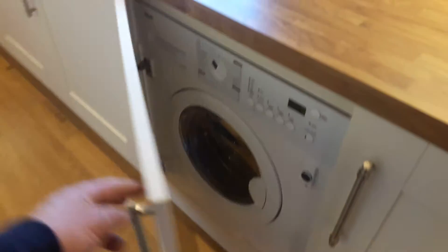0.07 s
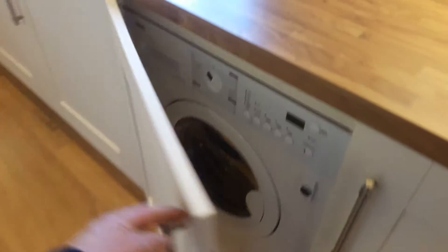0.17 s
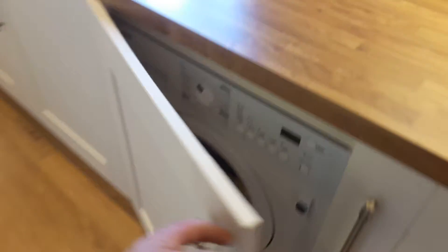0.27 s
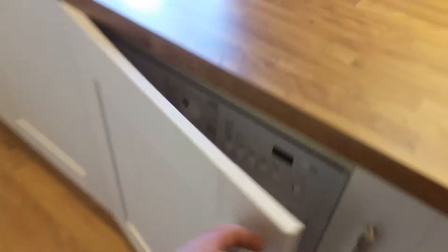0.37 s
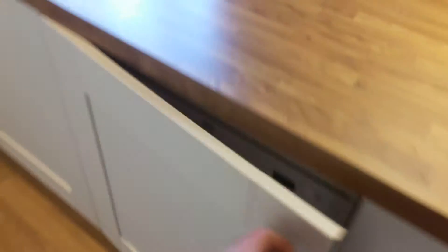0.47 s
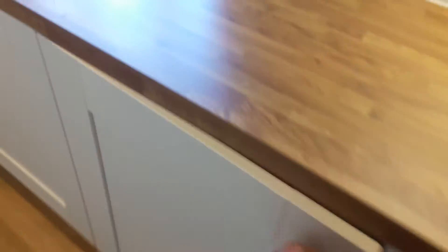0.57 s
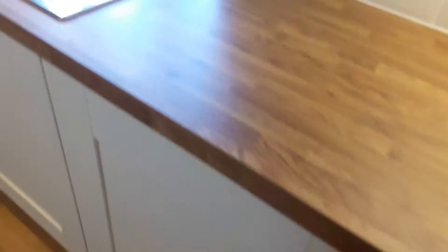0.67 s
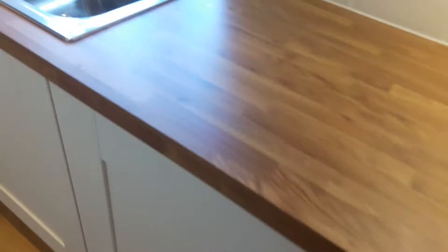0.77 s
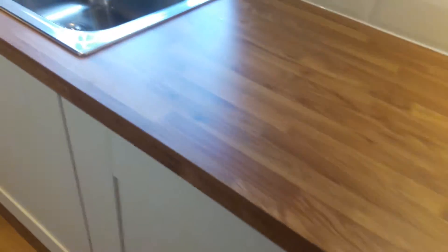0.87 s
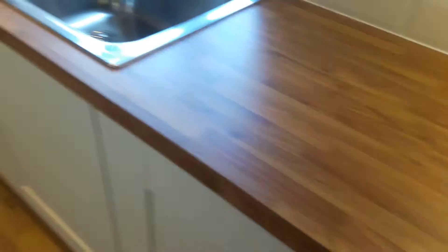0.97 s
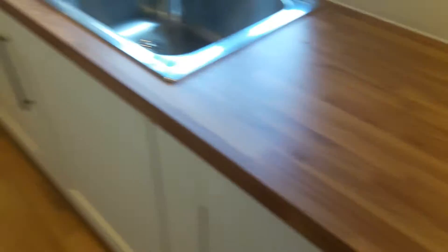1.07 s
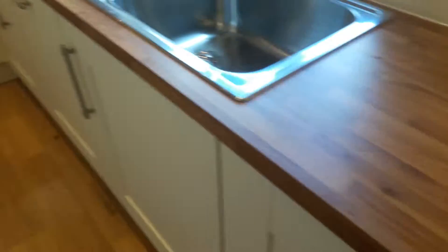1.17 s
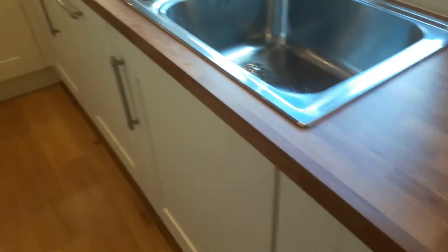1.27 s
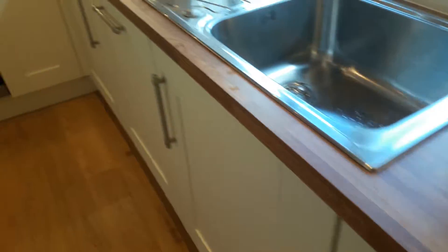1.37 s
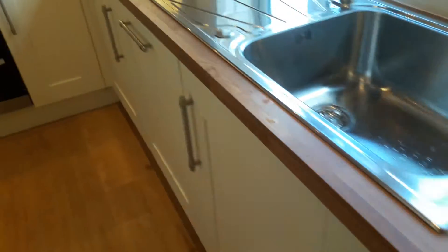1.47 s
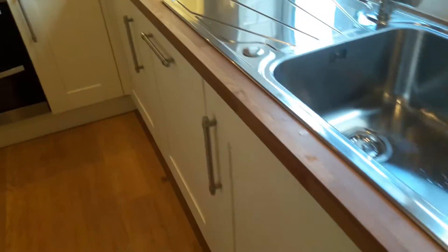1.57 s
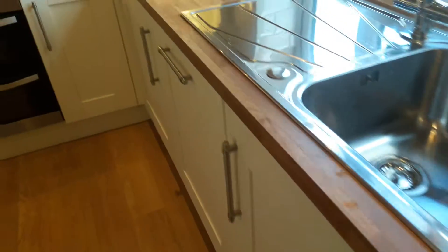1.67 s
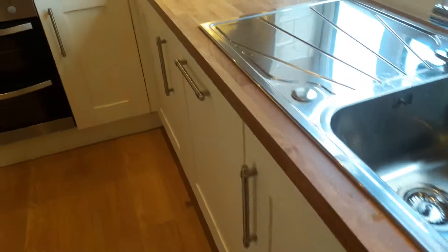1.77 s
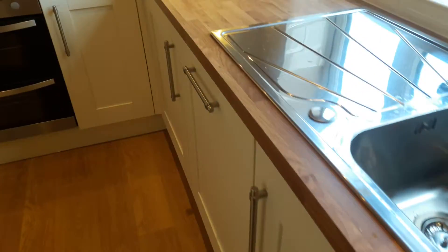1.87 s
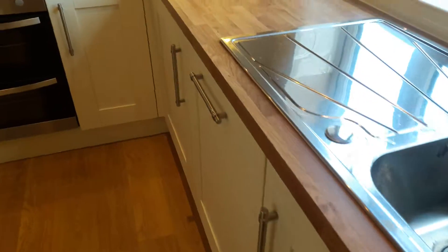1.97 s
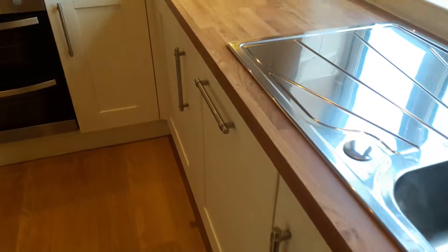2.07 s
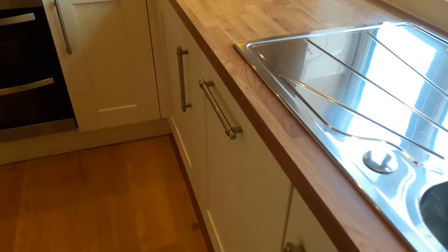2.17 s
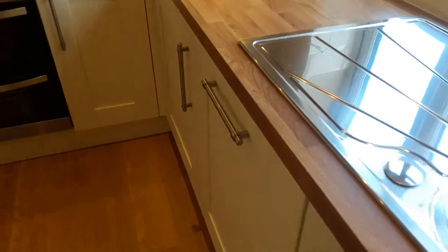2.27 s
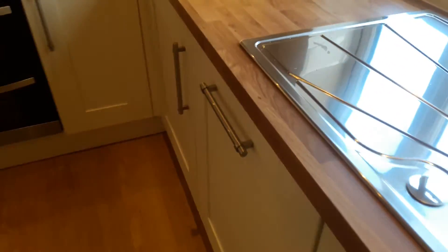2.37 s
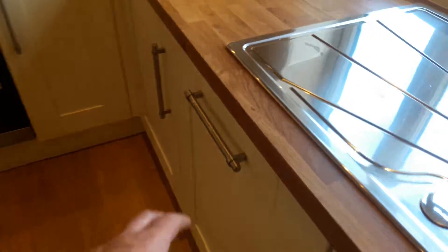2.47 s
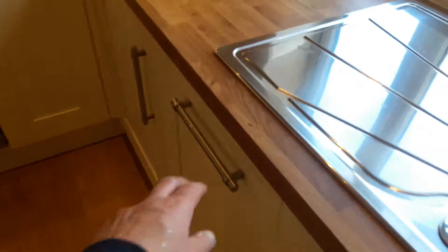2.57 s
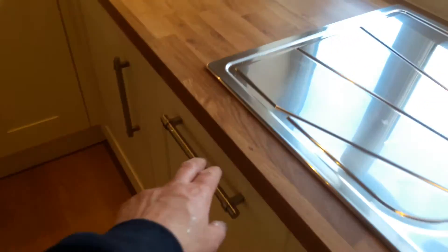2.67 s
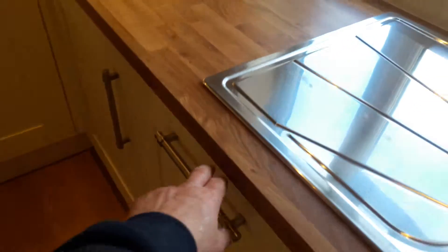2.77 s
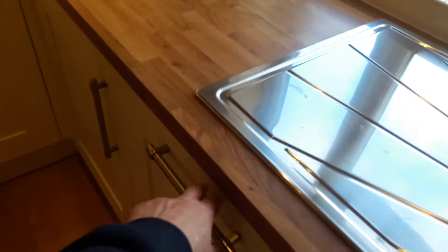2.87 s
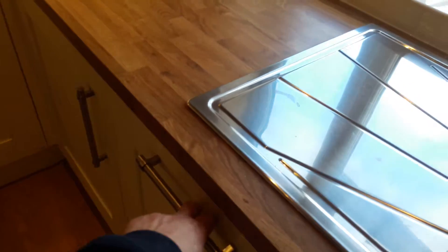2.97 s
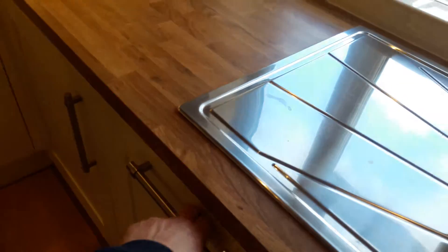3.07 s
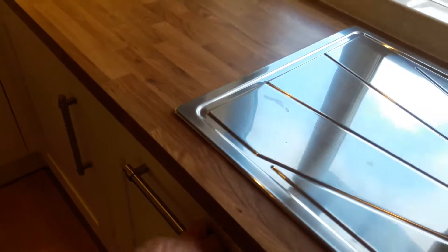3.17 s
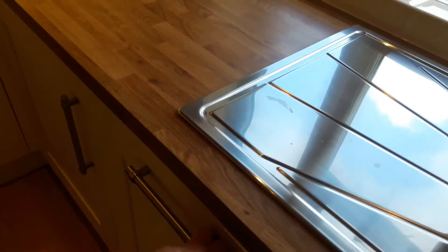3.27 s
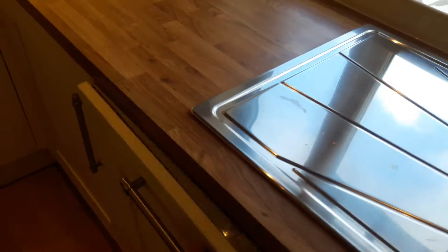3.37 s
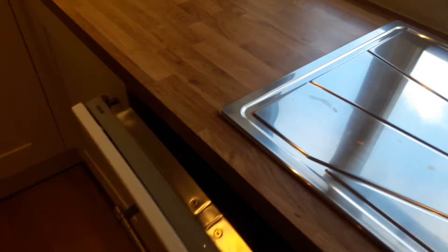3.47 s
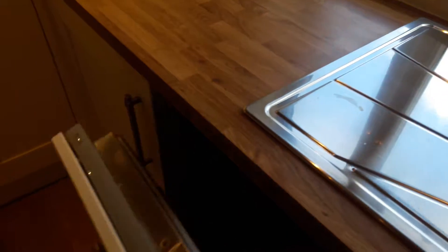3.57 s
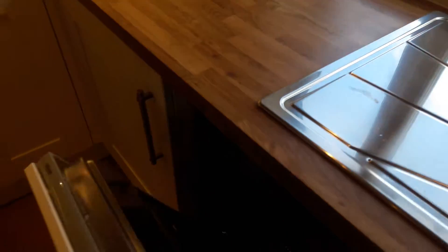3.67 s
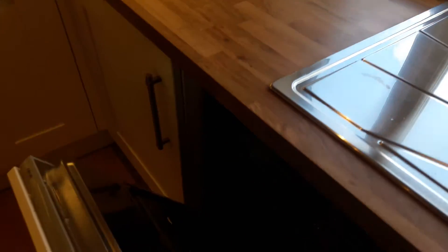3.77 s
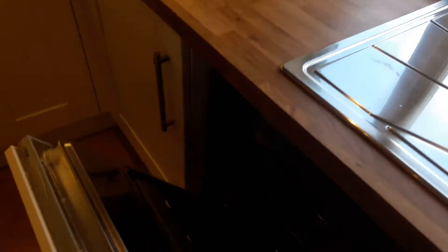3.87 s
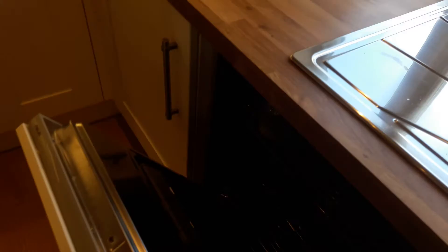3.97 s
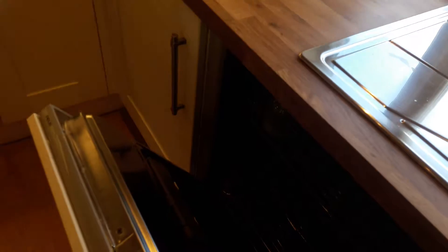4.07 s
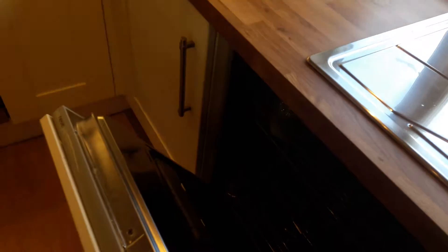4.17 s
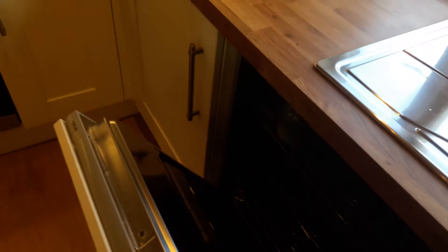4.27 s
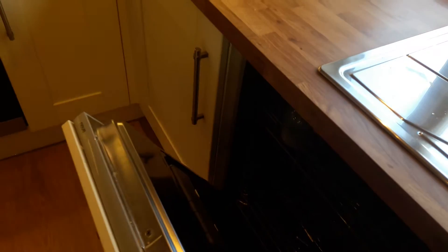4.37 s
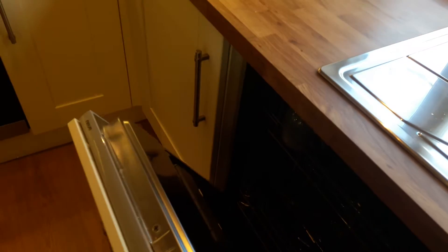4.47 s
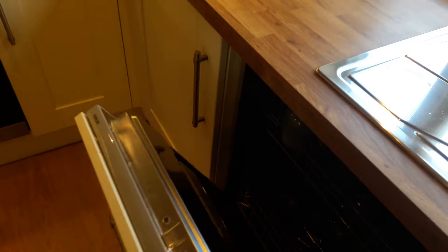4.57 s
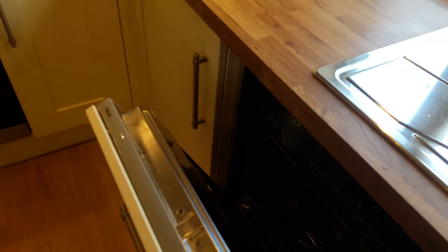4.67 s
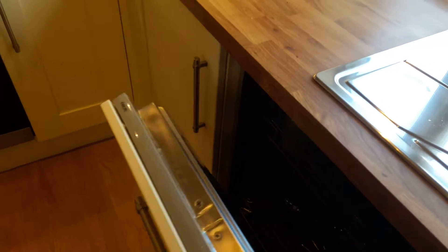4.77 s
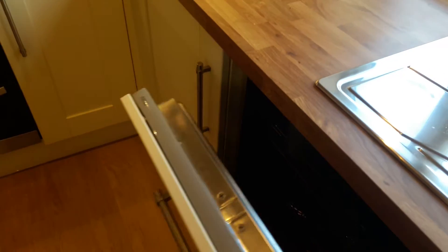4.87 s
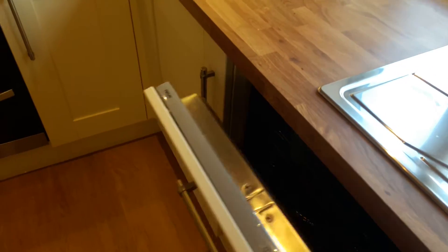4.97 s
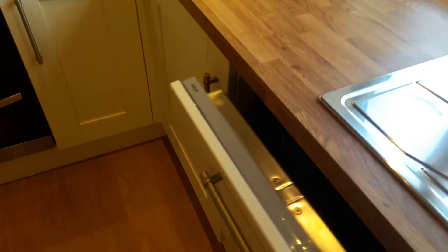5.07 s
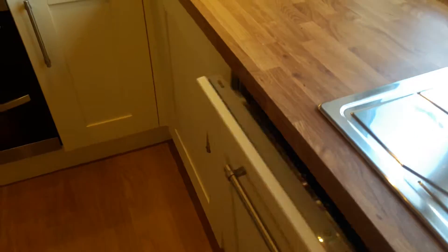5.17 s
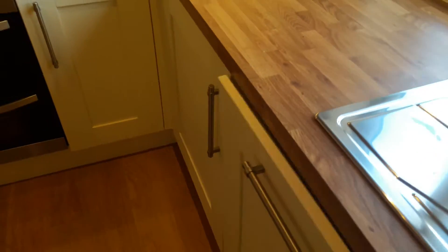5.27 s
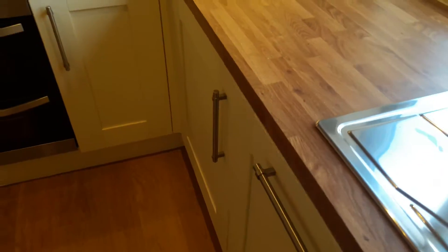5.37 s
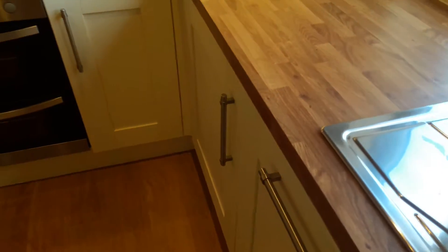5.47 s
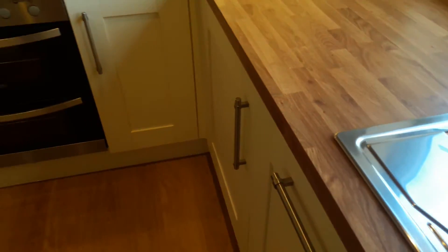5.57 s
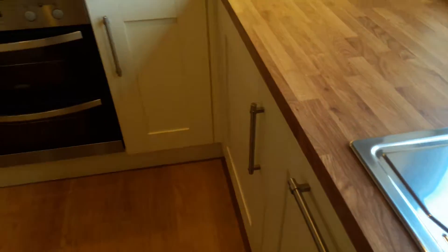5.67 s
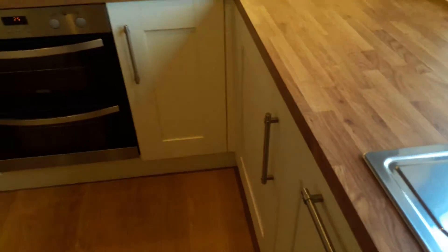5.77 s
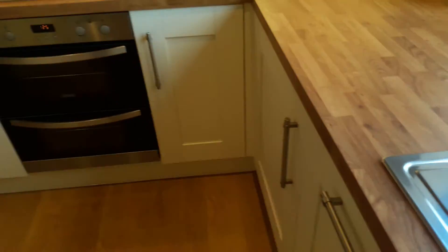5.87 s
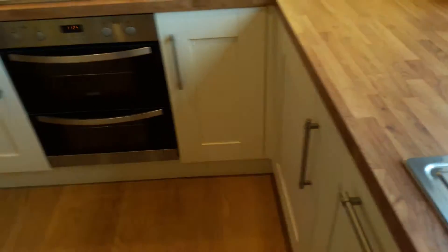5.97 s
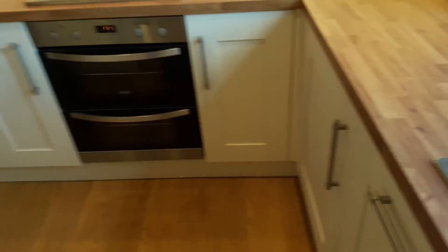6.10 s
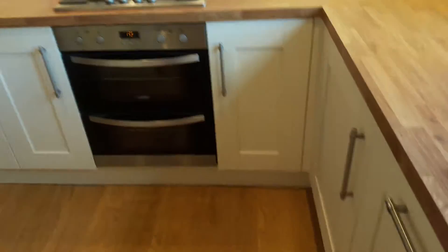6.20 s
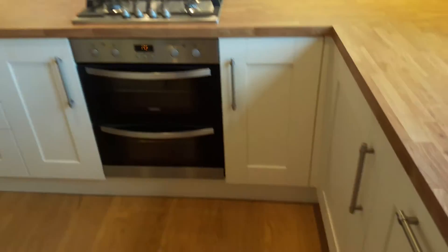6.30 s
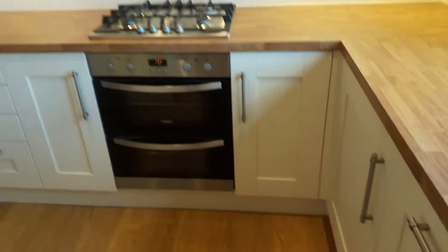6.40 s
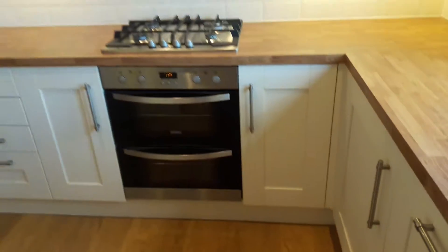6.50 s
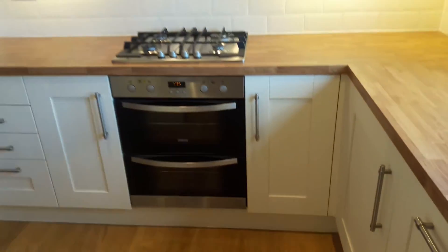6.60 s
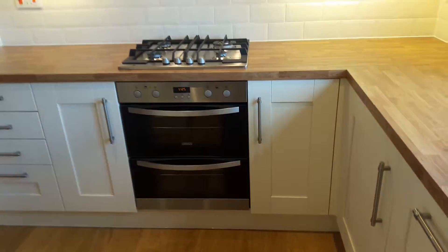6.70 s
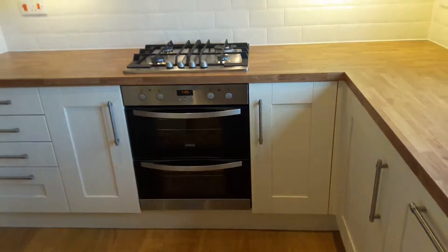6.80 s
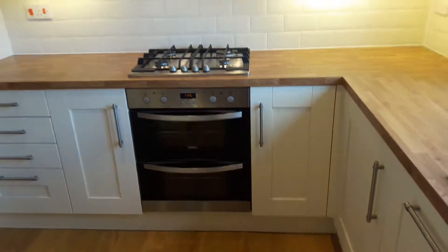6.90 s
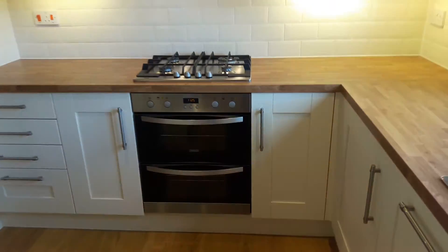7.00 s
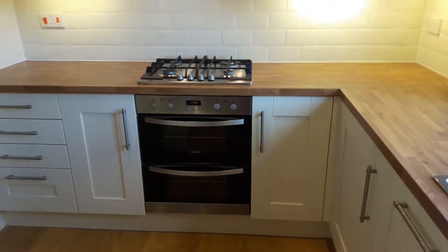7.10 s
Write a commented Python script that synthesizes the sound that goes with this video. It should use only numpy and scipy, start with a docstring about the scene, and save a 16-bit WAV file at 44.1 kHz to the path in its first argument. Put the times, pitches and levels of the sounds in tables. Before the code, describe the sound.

A cupboard door knocks shut in a bare, echoing kitchen. Someone takes a few light steps on wooden boards, clothes rustling softly, then pulls a dishwasher door off its latch with a loud clunk. After a short pause the door touches lightly and shuts with a loud, ringing thud, followed by a few faint steps. The nearby microphone also picks up soft low bumps, a faint hum and quiet room tone.

```python
"""A bare, echoing kitchen with a wooden floor. Someone shuts a cupboard, walks across the boards, pulls a
dishwasher door off its latch and pushes it shut again. Each door cracks, rings in its panel and sets the
room off; each footstep is a heel knock over a thud of the boards. Clothes rustle in swells of noise,
a hinge squeaks faintly and a low hum comes and goes, over a bed of room tone and soft low thumps."""
import sys
import numpy as np
from scipy import signal
from scipy.io import wavfile

SR = 44100
rng = np.random.default_rng(int(sys.argv[2]) if len(sys.argv) > 2 else 0)


def materialize(psi):
    """Save the field psi as 16-bit PCM at rate SR to the path in sys.argv[1].

    A 1-D psi becomes a single channel; in a 2-D psi each row is a channel.
    """
    bounded = np.clip(np.atleast_2d(psi).T, -1, 1)
    quanta = np.round(bounded * 32767).astype(np.int16)
    wavfile.write(sys.argv[1], SR, quanta)


N = 314850

# The door hits: cupboard shuts, latch opens, dishwasher door touches, then shuts. Each row: start in
# seconds, crack, ring and room sends in dB, rattle length in seconds, pan in dB (positive is left).
DOOR_HITS = [(0.773, -17, -20.5, -8.5, 0.025, 1.5), (3.3897, -8, -20.5, -2, 0.0076, 0.5),
             (5.468, -26, -44, -22.5, 0.028, 1), (5.733, -11, -15.5, 0.0, 0.025, 1)]
# The colour of each hit's crack. Each row: frequency in Hz, relative level in dB.
CUPBOARD_TONE = [(41, -49), (70, -60), (142, -11), (228, -16), (274, -7.5), (451, -14), (554, -10.5),
                 (761, -18), (853, -13), (1690, -18.5), (2650, -17.5), (2800, -27.5), (3330, -29),
                 (5020, -25), (11600, -38.5), (16000, -56)]
LATCH_TONE = [(41, -42), (70, -35), (135, -39), (190, -6), (274, -11), (307, -5), (344, -12.5), (494, -1),
              (744, -9.5), (892, -2.5), (1340, -12), (2020, -9.5), (4000, -23), (6500, -27.5), (7800, -25),
              (10000, -36), (12100, -32.5), (16000, -47)]
TOUCH_TONE = [(24, -39), (40, -18), (71, -25), (109, -22), (151, -1), (290, -2.5), (503, -12), (570, -13),
              (1070, -11.5), (1300, -17), (1810, -14.5), (2210, -19), (16000, -56.5)]
DISHWASHER_TONE = [(41, -31), (70, -29.5), (190, -2), (286, -5.5), (321, -13.5), (472, -1.5), (529, -7.5),
                   (711, -5), (1150, -16), (1470, -13.5), (1730, -18), (2540, -17.5), (5500, -30),
                   (8090, -32.5), (10500, -40.5), (12500, -36.5), (16000, -53)]
# The notes the doors ring with. Each row: pitch in Hz, relative level in dB, seconds to fade 60 dB.
CUPBOARD_MODES = [(209.4, -8, 0.38), (252, -14, 0.36), (276.6, 4, 0.41), (373.7, -6.5, 0.59),
                  (493, -11, 0.54), (568, -12, 0.22), (858, -4, 0.18), (1184, -4.5, 0.097),
                  (1502, -2.5, 0.063), (1838, -7, 0.062), (2460, -28, 0.0063), (4940, -4, 0.0066),
                  (5310, -1.5, 0.0048), (5900, -16, .008), (8160, -24, .006)]
LATCH_MODES = [(197.5, -1.5, 0.44), (490, -7, 0.3), (510, 5, 0.23), (704, -8, 0.34), (862, -4, 0.12),
               (891, -5.5, 0.28), (963, -8.5, 0.27), (1136, -3, 0.035), (1566, 8, 0.026),
               (2040, -10, 0.013), (5330, -14, 0.0095)]
DISHWASHER_MODES = [(158, -5, 0.45), (195.7, -1, 0.62), (282.5, -6, 0.58), (364.5, -9.5, 0.62),
                    (481, -2, 0.27), (585, -6.5, 0.49), (662, -10, 0.54), (693, -17, 0.19),
                    (1254, -35, 0.07), (1491, -2.5, 0.049), (2490, -1, 0.014), (3450, -10, 0.023),
                    (4260, -6, 0.0058), (8140, -10, 0.0031)]

# Heels and soles on wood. Each row: start in seconds, knock, thud, room and scuff sends in dB,
# knock pitch in Hz, treble tilt of the echo in dB per octave, pan in dB.
STEPS = [(0.22, -41.5, -39.5, -32.5, -58, 450, -15.5, 1), (0.437, -51, -51, -48, -52, 597, 3.5, 2),
         (1.539, -38.5, -51, -38.5, -51, 430, 1.5, 0.5), (1.63, -35, -52, -36.5, -43, 500, 1.5, 1.5),
         (2.346, -28.5, -34.5, -27.5, -44, 580, -4, 1.5), (2.522, -37.5, -55, -36, -56, 610, 0, 2),
         (5.049, -34.5, -41.5, -31.5, -52, 510, 1.5, 1.5), (5.39, -46, -46.5, -40, -50.5, 300, 0.5, 0.5),
         (5.702, -44, -46, -41, -60, 300, -11, 0), (6.483, -51, -45.5, -54, -62, 350, -10, 2),
         (6.512, -55, -54, -61, -60, 300, 7, 1), (6.808, -45, -39.5, -36.5, -44.5, 600, 1.5, 1)]
# The notes of the floorboards. Each row: pitch in Hz, relative level in dB, seconds to fade 60 dB.
BOARD_MODES = [(162.7, -5, 0.28), (192, -2, 0.19), (234.4, -4, 0.27), (499, -16, 0.16)]
# The colour a step sends into the room. Each row: frequency in Hz, relative level in dB.
STEP_TONE = [(24, -48), (40, -50), (149, -5.5), (234, -5), (405, -7.5), (593, -2), (890, -15.5),
             (1400, -23.5), (2610, -20), (5460, -41.5), (12000, -47), (15600, -74), (22000, -120)]
# Small bright ticks. Each row: start in seconds, level in dB, pitch in Hz, pan in dB.
TICKS = [(1.5844, -51, 7550, 0.5), (1.8862, -50, 11100, 6.0)]

# Moves of the clothes. Each row: peak time in seconds, rise and fall in seconds per 20 dB,
# then body, swish and fine hiss levels in dB.
RUSTLES = [(0.3, 0.13, 0.28, -51.5, -58.5, -79), (0.6, 0.12, 0.32, -58, -64.5, -88),
           (1.3, 0.6, .4, -61.5, -61, -77), (1.59, 0.084, .15, -58, -54.5, -69),
           (1.77, 0.42, 0.21, -53, -59.5, -78), (1.89, .02, .12, -63, -72, -72),
           (2.04, 0.15, 0.27, -60, -61.5, -80), (2.24, .4, 0.37, -59.5, -58, -75),
           (2.38, 0.078, .25, -67, -64, -77), (2.66, .3, 0.17, -56.5, -57.5, -72),
           (2.88, 0.18, 0.49, -69, -57.5, -75), (3.14, 0.58, 0.15, -56, -66.5, -86),
           (3.25, 0.11, 0.25, -68, -55, -70), (3.38, 0.18, 0.06, -49, -64, -76),
           (3.88, 0.3, 0.25, -53.5, -54.5, -64.5), (4.53, 0.99, 1, -63, -61, -75),
           (4.988, 0.047, .06, -75, -67, -82), (5.075, .04, .2, -61.5, -56, -76),
           (5.37, 0.099, 0.12, -52, -62, -91), (6.3, .2, 0.17, -62, -67, -76),
           (6.5, 0.059, 0.31, -69, -61.5, -70), (6.62, 0.16, 0.78, -54.5, -63, -82),
           (6.78, 0.37, .1, -68, -59.5, -77), (6.9, 0.19, 0.17, -62, -56, -79),
           (7.11, 0.2, .2, -65.5, -63, -89)]
# The three registers of cloth, low to high. Each row: frequency in Hz, relative level in dB.
CLOTH_BODY = [(59, -69), (100, -13.5), (338, -6.5), (678, -13), (755, -11), (1240, -13.5), (4000, -33),
              (5200, -68), (8800, -120)]
CLOTH_SWISH = [(1180, -13.5), (2000, -2.5), (3720, -8.5), (4740, -10), (5750, -15), (6920, -14),
               (9400, -21), (11000, -35), (14300, -51), (22000, -120)]
CLOTH_HISS = [(5290, -35), (9000, -4), (12800, 5), (15100, -15), (16000, -36)]
# Hinge squeaks. Each row: peak time in seconds, rise and fall in seconds per 20 dB, pitch in Hz,
# width in Hz, level in dB.
SQUEAKS = [(5.415, .1, .05, 6330, 200, -70), (5.36, .04, .04, 5050, 400, -70),
           (5.0, .04, .15, 8000, 200, -78)]

# The fader ride of the hum. Each row: time in seconds, level in dB.
HUM_RIDE = [(0.0, -82), (0.14, -64), (0.4, -87), (1.3, -85), (1.46, -63), (1.95, -65.5), (2.3, -68),
            (2.9, -91), (3.08, -55), (3.2, -59.5), (3.4, -59), (4.151, -73), (4.25, -64), (4.6, -64.5),
            (5.0, -66.5), (5.23, -70), (5.3, -64), (6.2, -64), (6.46, -70), (6.52, -60.5), (6.66, -57.5),
            (6.8, -66), (7.14, -83)]
# Soft low thumps. Each row: peak time in seconds, level in dB, fall in seconds per 20 dB (zero or less cuts off
# at once).
THUMPS = [(0.0, -64.5, 0.5), (0.23, -68, -1.5), (0.45, -69, .3), (0.812, -52, .45), (1.36, -63.5, 0.4),
          (1.63, -64.5, -1.2), (1.99, -75, 2), (2.35, -68, -2.5), (2.72, -77, 1), (3.14, -62, 0),
          (3.42, -49, 0.4), (3.52, -53, -1), (5.07, -74, 7), (5.4, -71, -2), (5.53, -46, 0),
          (5.81, -34.5, .12), (5.939, -49.5, 0.27), (6.48, -71, 0.5), (6.81, -74, .2)]
# The colours of the thumps and of the room tone. Each row: frequency in Hz, relative level in dB.
THUMP_TONE = [(15, -27), (40, -20), (90, -12), (140, -10.5), (400, -91)]
AIR_TONE = [(26, -39), (45, -31), (48, -16), (65, -53), (146, -2.5), (217, -1.5), (346, -4.5), (818, -5.5),
            (1370, -6.5), (2030, -6), (5840, -20), (7850, -18.5), (9550, -26), (14900, -20.5), (16000, -25)]

# The kitchen's reverb time. Each row: frequency in Hz, seconds to fade 60 dB.
REVERB_TIMES = [(60, 0.41), (200, 0.72), (500, 0.58), (1000, 0.96), (2000, 0.92), (4000, 0.79),
                (7000, 0.66), (11000, 0.43), (13000, 0.41), (15500, 0.33)]
# Stereo likeness, first of reverb and thumps, then of cloth and room tone.
# Each row: frequency in Hz, correlation of left and right (1 is mono).
ROOM_LIKENESS = [(60, 0.9), (130, 0.98), (290, 0.96), (640, 0.68), (1410, -0.32), (3100, 0.12),
                 (6820, -0.14), (15000, 0.57)]
AIR_LIKENESS = [(100, 0.4), (300, 0.9), (700, 0.48), (1500, 0.024), (8000, 0.021)]
# How the microphone pair leans to one side. Each row: frequency in Hz, pan in dB.
MIC_LEAN = [(60, 0), (110, 1), (200, -2.5), (380, 2.5), (700, -1), (1290, -2.0), (2380, -3.5), (4400, -6),
            (8120, 0), (15000, 6.5)]


def doors():
    """A short rattle of contacts cracks, the door's panel rings, and both spill into the room."""
    out, t = np.zeros((2, N)), np.arange(SR // 2) / SR
    tones = (CUPBOARD_TONE, LATCH_TONE, TOUCH_TONE, DISHWASHER_TONE)
    panels = (CUPBOARD_MODES, LATCH_MODES, DISHWASHER_MODES, DISHWASHER_MODES)
    for (start, crack_db, ring_db, room_db, rattle_s, pan_db), tone, modes in zip(DOOR_HITS, tones, panels):
        progress = t[:4096] / rattle_s
        contacts = rng.standard_normal((3, 4096)) * np.sqrt(progress) * np.exp(-3 * progress)
        rattle = contacts[0] + 0.5 * contacts[1:]  # spread in stereo along the door edge
        rattle /= np.linalg.norm(rattle[0])
        click = shaped_click(tone)
        crack = 10 * gain_of(crack_db) * signal.fftconvolve(rattle, click[None])
        hz, db, t60 = np.transpose(modes)[..., None]
        rings = ping(t, hz, ring_db + db, t60) * fade_in(t, rise_s=2.2 / hz)
        radiated = (rings * (hz / 1000) ** 0.84).sum(0)  # high modes carry better into the room
        send = gain_of(room_db) * np.pad(click, (0, len(t) - len(click))) + gain_of(-20.5) * radiated
        for layer in (crack, rings.sum(0), reverb(send, rise_s=0.0032, length=SR)):
            place(out, start, layer, pan_db)
    return out


def footsteps():
    """Each step knocks and thuds through the boards, and the room answers a moment later."""
    out, t = np.zeros((2, N)), np.arange(8192) / SR
    thud = sum(ping(t, *mode) for mode in BOARD_MODES) * fade_in(t, rise_s=0.0025)
    for start, knock_db, thud_db, room_db, _, hz, tilt_db, pan_db in STEPS:
        knock = -2 * ping(t, hz, knock_db, t60=0.029) * fade_in(t, rise_s=0.00052)
        place(out, start, knock + gain_of(thud_db) * thud, pan_db)
        send = gain_of(room_db) * shaped_click(STEP_TONE, tilt_db) + gain_of(-37.5) * knock[:2048]
        place(out, start + 0.004, reverb(send, rise_s=0.00067), pan_db)  # 4 ms of pre-delay
    return out


def ticks():
    """Tiny bright pings that die at once and leave a touch of reverb."""
    out, t = np.zeros((2, N)), np.arange(8192) / SR
    for start, db, hz, pan_db in TICKS:
        tick = ping(t, hz, db, t60=0.0047)
        place(out, start, tick, pan_db)
        place(out, start, gain_of(-17) * reverb(tick, rise_s=0.004), pan_db)
    return out


def clothes():
    """Cloth noise in three registers swells with each move; each step adds a scuff in the lowest."""
    body, swish, hiss = (sum(swell(*row[:3], row[column]) for row in RUSTLES) for column in (3, 4, 5))
    scuff_rise_s, scuff_fall_s = 0.0067, 0.16
    for start, _, _, _, scuff_db, *_ in STEPS:
        body += swell(start + scuff_rise_s, scuff_rise_s, scuff_fall_s, scuff_db)
    registers = ((body, CLOTH_BODY), (swish, CLOTH_SWISH), (hiss, CLOTH_HISS))
    return sum(envelope(power) * noise_bed(tone, AIR_LIKENESS, frame=512) for power, tone in registers)


def hinge():
    """The hinge whistles faintly: short, high swells of a partly steady, partly wavering tone."""
    return sum(envelope(swell(peak_s, rise_s, fall_s, db)) * wavering_tone(hz, width_hz, steady=0.6)
               for peak_s, rise_s, fall_s, hz, width_hz, db in SQUEAKS)


def hum():
    """A low, throbbing hum that comes and goes."""
    level_db = np.interp(np.arange(N) / SR, *np.transpose(HUM_RIDE))
    return gain_of(level_db) * wavering_tone(hz=209, width_hz=15)


def thumps():
    """Soft bumps come as swells of deep rumble."""
    power = sum(swell(peak_s, rise_s=0.07, fall_s=fall_s, db=db) for peak_s, db, fall_s in THUMPS)
    return envelope(power) * noise_bed(THUMP_TONE, ROOM_LIKENESS, frame=4096)


def room_tone():
    """A steady bed of kitchen air and microphone hiss."""
    return gain_of(-60.5) * noise_bed(AIR_TONE, AIR_LIKENESS, frame=1024)


def reverb(send, rise_s, length=SR // 2):
    """The kitchen's answer: dense reflections build up, then each band dies at its own speed."""
    tail = stereo_noise(lambda hz, t: -60 * t / curve_at(REVERB_TIMES, hz), length, ROOM_LIKENESS, 512)
    tail *= fade_in(np.arange(length) / SR, rise_s)
    return signal.fftconvolve(send[None], 10 * tail / np.linalg.norm(tail[0]), axes=1)


def gain_of(db):
    """Decibels as a gain."""
    return 10 ** (np.asarray(db) / 20)


def unit_rms(sound):
    """The sound brought to an RMS of 1."""
    return sound / np.sqrt(np.mean(sound ** 2) + 1e-20)


def curve_at(points, hz):
    """A curve's value at hz, along a log frequency axis."""
    point_hz, values = np.transpose(points)
    return np.interp(np.log(hz + 1), np.log(point_hz + 1), values)


def place(mix, start, sound, pan_db):
    """Drop a sound into the mix at start seconds, pan_db louder on the left."""
    part = mix[:, round(start * SR):][:, :sound.shape[-1]]
    part += sound[..., :part.shape[1]] * gain_of([[pan_db / 2], [-pan_db / 2]])


def ping(t, hz, db, t60):
    """One struck mode: a sine that fades 60 dB in t60 seconds."""
    return gain_of(db - 60 * t / t60) * np.sin(2 * np.pi * hz * t)


def fade_in(t, rise_s):
    """A rounded attack from silence to full level."""
    return 1 - np.exp(-t / rise_s)


def shaped_click(tone, tilt_db=0):
    """The tightest click with this colour (minimum phase), at unit energy."""
    hz = abs(np.fft.fftfreq(4096, 1 / SR))
    level_db = curve_at(tone, hz) + tilt_db * np.log2(1 + hz / 500)
    log_gain = np.log(gain_of(np.maximum(level_db, -100)))
    phase = -signal.hilbert(log_gain).imag
    click = np.fft.ifft(np.exp(log_gain + 1j * phase)).real[:2048]
    return click / np.linalg.norm(click)


def stereo_noise(level_db, length, likeness, frame):
    """Stereo noise, sculpted over frequency and time by level_db(hz, t)."""
    hz = np.fft.rfftfreq(frame, 1 / SR)[:, None]
    t = np.arange(4 * length // frame + 5) * frame / 4 / SR
    draws = rng.standard_normal((len(t), len(hz), 4)).T
    left, unrelated = draws[::2] + 1j * draws[1::2]
    shared = np.clip(curve_at(likeness, hz), -1, 1)
    right = shared * left + np.sqrt(1 - shared ** 2) * unrelated
    spectra = np.array([left, right]) * gain_of(level_db(hz, t))
    return signal.istft(spectra, nperseg=frame, noverlap=3 * frame // 4)[1][:, :length]


def noise_bed(tone, likeness, frame):
    """Steady stereo noise of one colour, as long as the scene."""
    return unit_rms(stereo_noise(lambda hz, _: curve_at(tone, hz), N, likeness, frame))


def swell(peak_s, rise_s, fall_s, db):
    """Power, every 64 samples, of a swell that climbs 20 dB in rise_s and drops 20 dB in fall_s."""
    t = np.arange(0, N, 64) / SR - peak_s
    drop_db = 20 * np.where(t < 0, -t / max(rise_s, 0.005), t / max(fall_s, 0.005))
    return gain_of(db - drop_db) ** 2


def envelope(power):
    """Gain per sample from the power of swells."""
    return np.interp(np.arange(N), np.arange(0, N, 64), np.sqrt(power))


def wavering_tone(hz, width_hz, steady=0):
    """Noise in one narrow resonance wavers and throbs; steady blends in a pure tone."""
    pole = np.exp(-np.pi * width_hz / SR)
    waver = rng.standard_normal(N) + 1j * rng.standard_normal(N)
    for _ in range(2):
        waver = signal.lfilter([1 - pole], [1, -pole], waver)
    carrier = np.exp(2j * np.pi * hz * np.arange(N) / SR)
    return unit_rms(((steady + waver / np.std(waver)) * carrier).real)


def scene():
    """Doors up front, the person's movements behind them, hum and room tone underneath."""
    return doors() + footsteps() + ticks() + clothes() + hum() + hinge() + room_tone() + thumps()


def record(dry):
    """The microphone pair leans left or right by frequency, cuts the very top and adds a tiny DC offset."""
    hz = np.fft.rfftfreq(512, 1 / SR)
    lean_db = curve_at(MIC_LEAN, hz)
    lean = np.array([signal.firwin2(255, hz, gain_of(side * lean_db / 2), fs=SR) for side in (1, -1)])
    high_cut = signal.firwin(511, cutoff=15800, window=("kaiser", 9), fs=SR)[None]
    leaning = signal.oaconvolve(dry, lean, "same", axes=1)
    return signal.oaconvolve(leaning, high_cut, "same", axes=1) - 0.0005


dry = scene()
out = record(dry)
materialize(out)
```